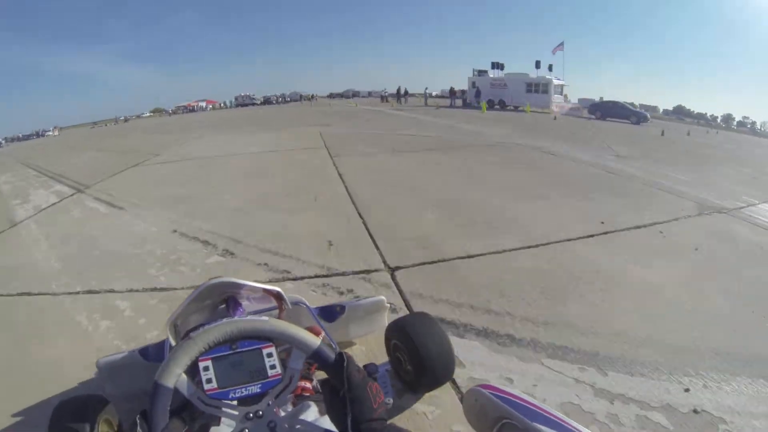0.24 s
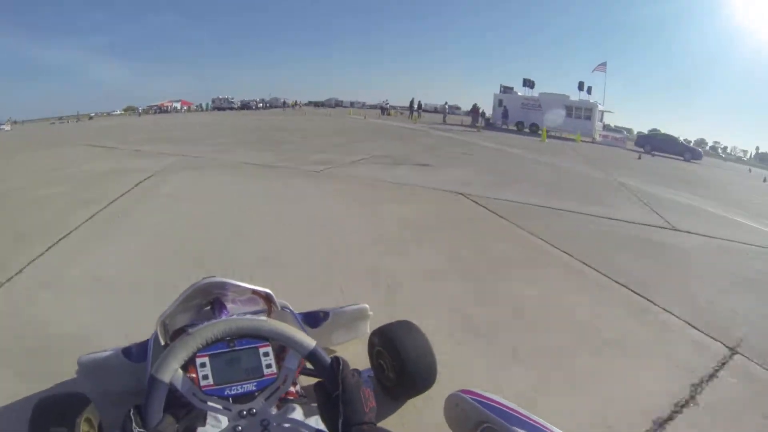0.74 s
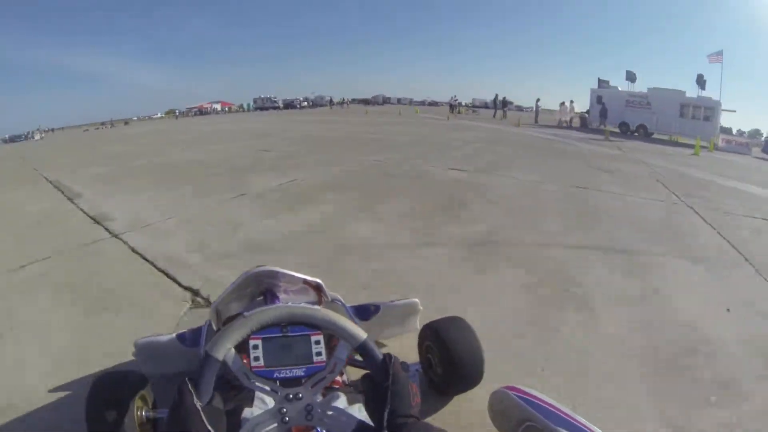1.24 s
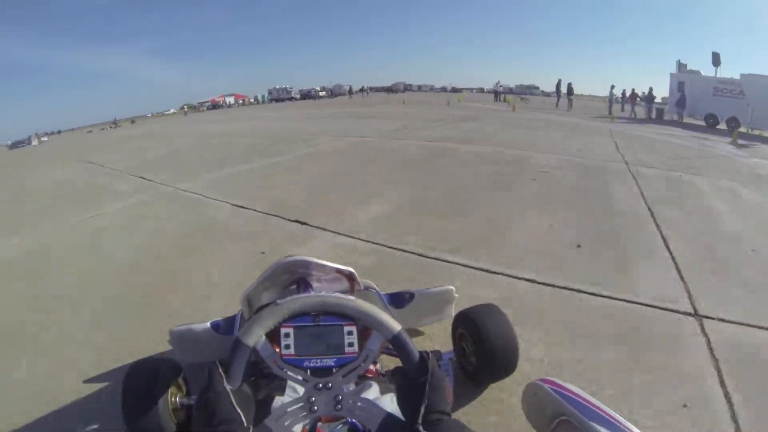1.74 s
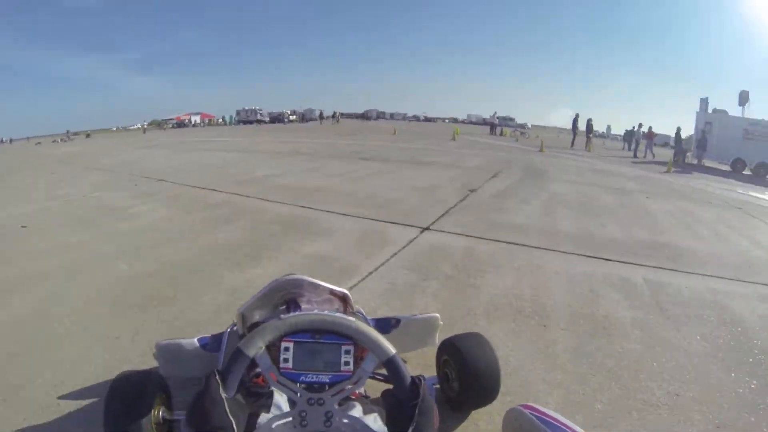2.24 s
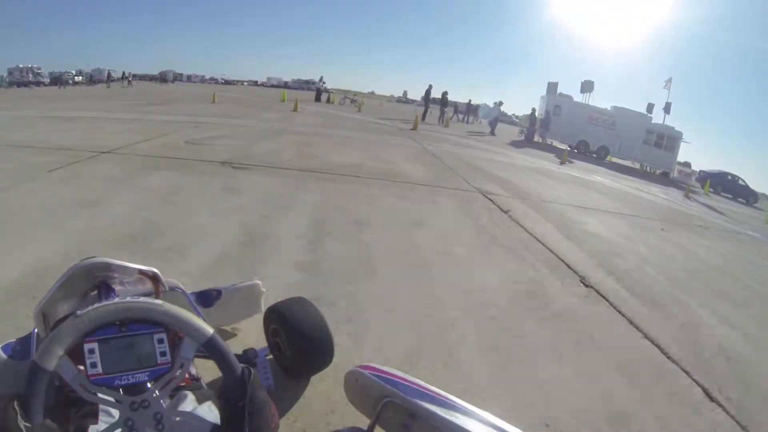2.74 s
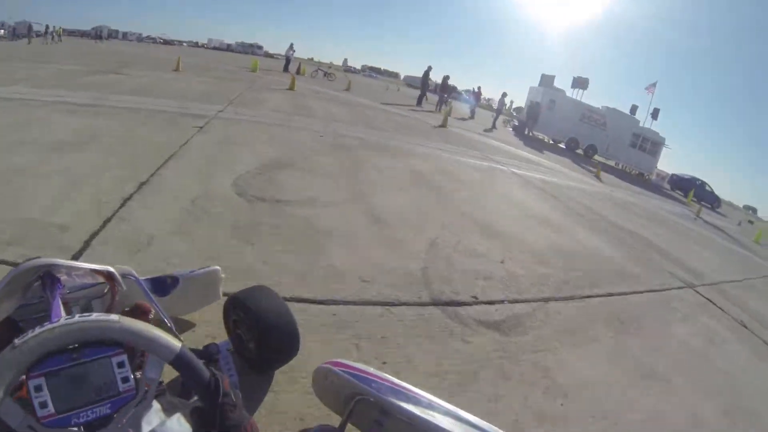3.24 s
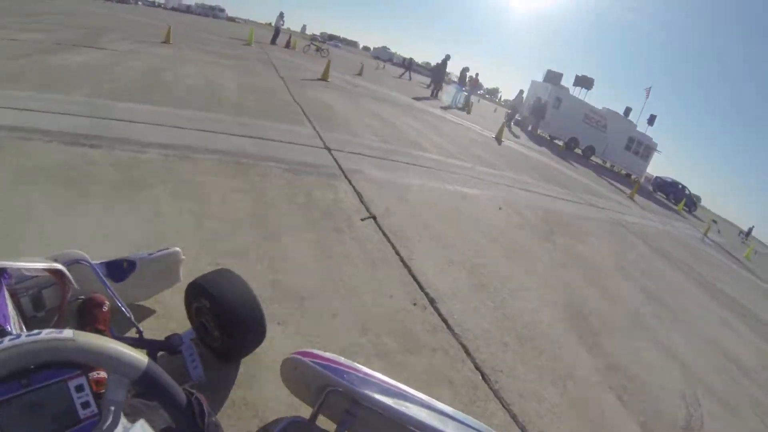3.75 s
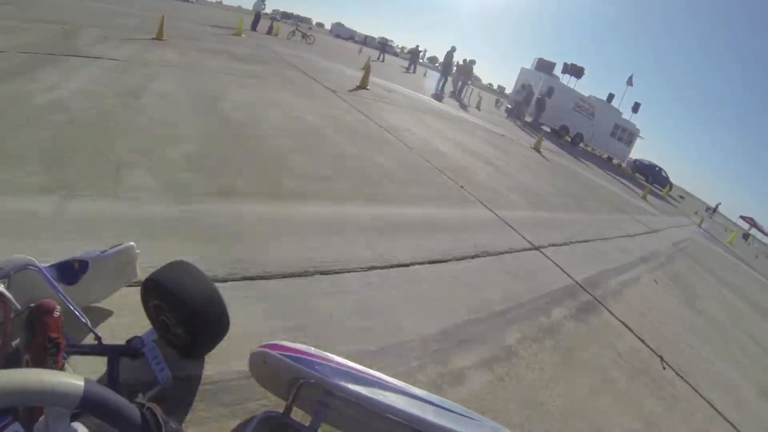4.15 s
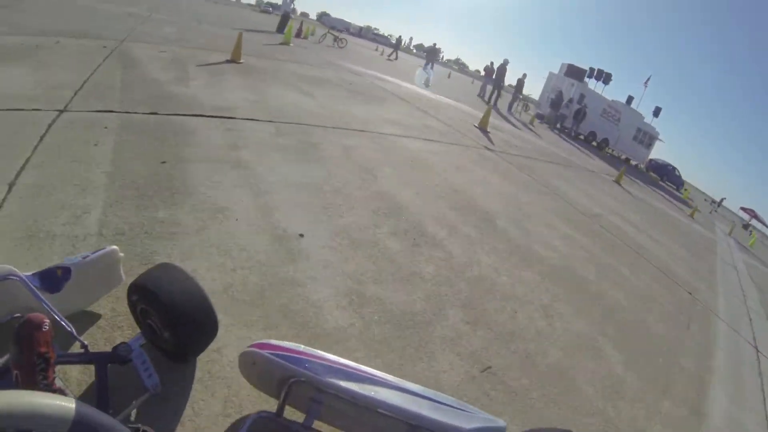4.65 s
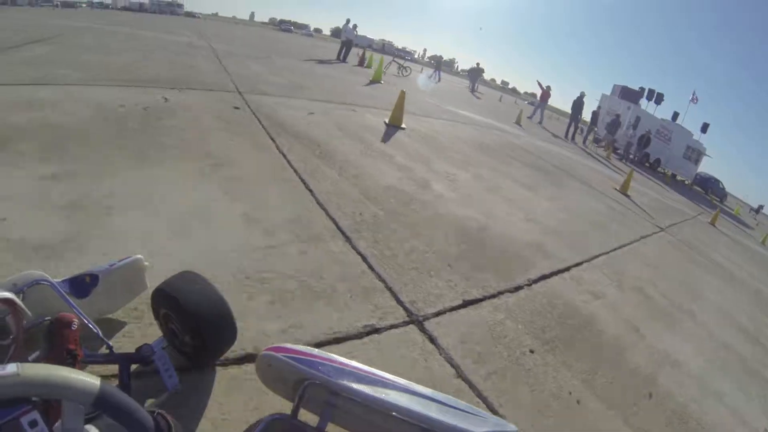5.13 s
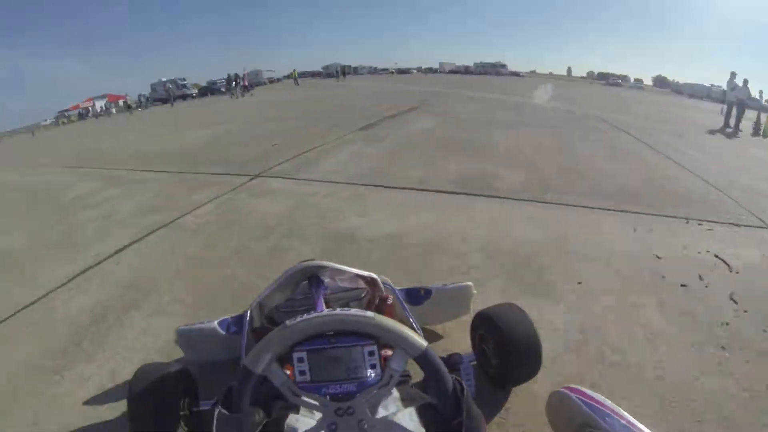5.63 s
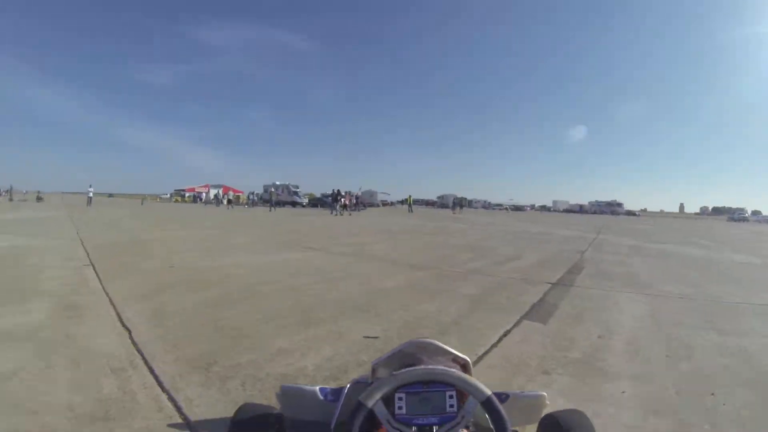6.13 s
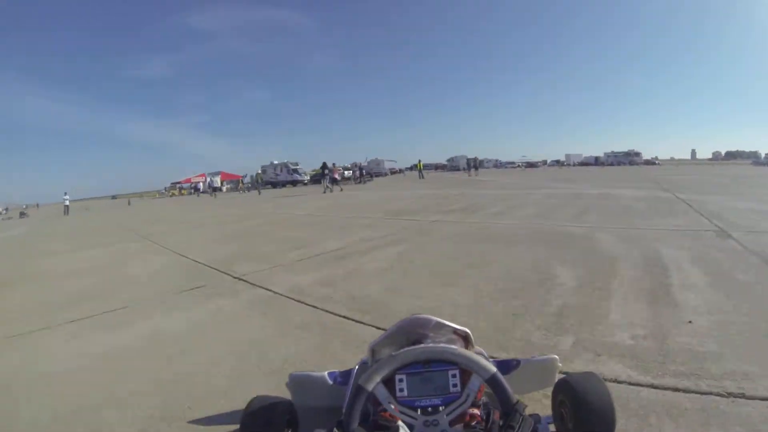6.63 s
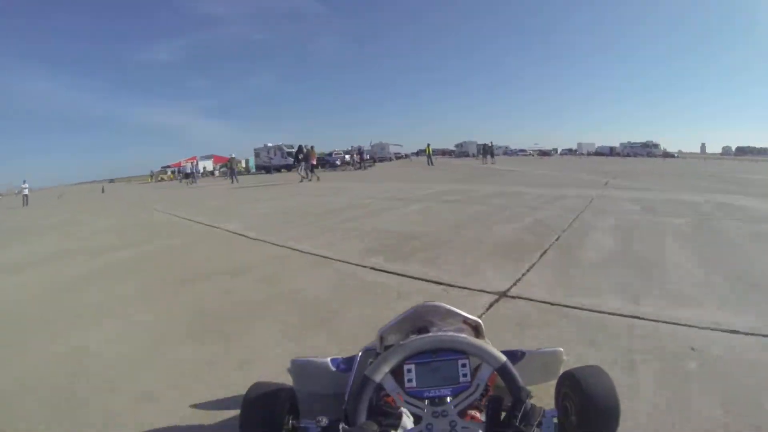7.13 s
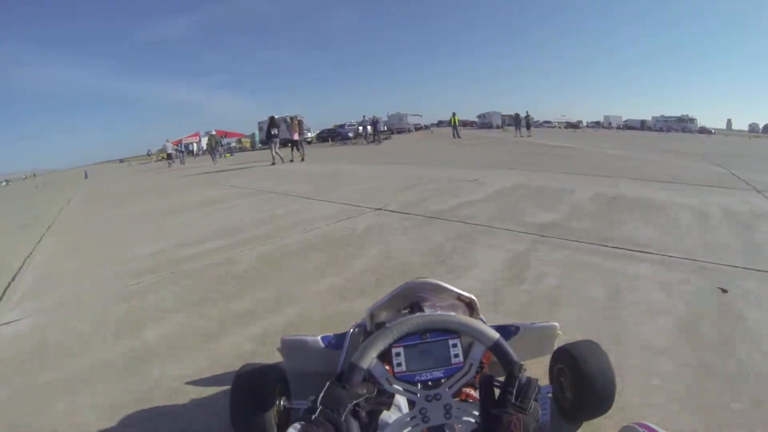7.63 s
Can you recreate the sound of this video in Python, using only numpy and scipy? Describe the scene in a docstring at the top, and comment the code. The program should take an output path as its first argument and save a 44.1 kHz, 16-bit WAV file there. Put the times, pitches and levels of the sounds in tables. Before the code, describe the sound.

A go-kart's single-cylinder engine putters and clatters near idle as it coasts over open concrete, heard from on board. Wind rumbles on the microphone and the frame shudders underneath. A faint, thin brake squeal swells and fades, with one sharp tick of grit. Then the engine revs up in a louder, barking burst for about a second and a half before easing off again.

```python
"""An open concrete course, heard from on board a kart with a four-stroke single-cylinder engine.
It coasts near idle through a long bend, takes a short burst of throttle and coasts again.
Underneath, wind buffets the microphone, the tyres roar and the frame shudders on the slabs;
the bend brings in a thin metallic brake rub. Up front, each engine cycle rattles the covers,
thumps the exhaust pipe and, under throttle, barks through the intake."""
import sys
import numpy as np
from scipy import signal
from scipy.fft import rfft, irfft, next_fast_len
from scipy.io import wavfile
from scipy.ndimage import uniform_filter1d, map_coordinates

SR = 44100
rng = np.random.default_rng(int(sys.argv[2]) if len(sys.argv) > 2 else 0)


def unload_audio(sound):
    """Save the sound as a 16-bit wav file, at the path given as the first command line argument."""
    columns = np.transpose(np.atleast_2d(sound))
    # keep every value between -1 and 1, then stretch to whole-number steps
    steps = np.round(np.clip(columns, -1, 1) * 32767)
    wavfile.write(sys.argv[1], SR, steps.astype(np.int16))


N = 347508
TIME = np.arange(N) / SR
FREQS = np.fft.rfftfreq(next_fast_len(N + SR // 2), 1 / SR)

# fader for the wind, ahead of its gusts: t/s, level/dB
WIND_FADER = [(0, -24), (1.5, -23.5), (2.1, -23.5), (3.1, -32.5), (5.95, -33), (6.2, -21), (7, -21.5),
              (7.88, -29)]
# tone of tyres rolling on concrete: f/Hz, gain/dB
TYRE_EQ = [(90, -8.5), (200, 3), (280, -0.5), (420, 3), (700, -3), (830, -10), (1500, -30)]
# grit flicked against the kart: t/s, level/dB, decay/s; its tone: f/Hz, gain/dB
GRIT_HITS = [(4.7333, -10.5, 0.0016)]
GRIT_EQ = [(500, -20), (1600, 6), (2600, 7), (3500, 6), (4800, -14), (6100, -6), (7200, -13), (8300, -5),
           (10000, -6), (11800, -25), (13700, -26), (14500, -34)]
# knocks over slab joints: t/s, level/dB, decay/s; their tone: f/Hz, gain/dB
JOINT_HITS = [(1.458, -30.5, 0.0068), (7.311, -23.5, 0.0056)]
JOINT_EQ = [(100, -26), (500, 23), (1100, 9), (2500, 3), (5200, 9), (7000, -43), (14000, -48)]
# loose metal chinking over bumps: t/s, level/dB, decay/s; its tone, shared by the sand: f/Hz, gain/dB
CHINK_HITS = [(2.357, -43, 0.01), (2.759, -39, .008), (3.078, -39, .011), (3.151, -40.5, 0.0087),
              (3.46, -40, .009), (3.627, -39, 0.0077), (4.689, -42, .008), (5.074, -37, .007)]
CHINK_EQ = [(3000, -22), (4500, -6), (5900, -14), (6800, 5), (7900, -15), (9200, -4), (10600, -21),
            (12100, -14), (14500, -28)]
# loose parts buzzing briefly: t/s, f/Hz, width/Hz, level/dB, half length/s
BUZZ_CUES = [(0.934, 1460, 140, -23, 0.0066), (2.364, 4400, 200, -42, 0.024), (4.071, 6780, 200, -38, .008),
             (7.332, 5100, 710, -40, 0.016), (7.405, 5050, 550, -37, .008)]
# fader for the chain's whirr: t/s, level/dB
CHAIN_FADER = [(0, -38), (1.5, -52.5), (5.4, -42), (6.9, -40), (7.3, -39.5), (7.88, -38.5)]
# chain and sprocket resonances: f/Hz, width/Hz, gain/dB
SPROCKET_MODES = [(2793, 125, 6), (5200, 180, -5.5), (5600, 310, -21)]
# fader for the brake disc's ringing note: t/s, level/dB
SQUEAL_FADER = [(0, -57), (2.2, -55), (3.3, -50.5), (4.2, -47), (4.4, -42), (4.9, -44), (5.45, -51),
                (5.9, -68)]
# brake disc resonances: f/Hz, width/Hz, gain/dB
DISC_MODES = [(3240, 190, 4), (4600, 130, -5), (6780, 150, -3.5), (9200, 380, -13.5)]
# rough patches of concrete that jolt the frame: t/s, level/dB, half length/s
JOLT_CUES = [(0.051, -23.5, 0.069), (0.44, -24.5, 0.093), (1.202, -24, 0.094), (2.136, -26, 0.053),
             (2.516, -26, .045), (2.677, -23, 0.068), (2.848, -20.5, 0.017), (4.7, -27.5, 0.14),
             (5.682, -24.5, 0.033), (6.22, -27, 0.12), (6.804, -29, 0.089), (7.302, -18, 0.04),
             (7.709, -23, 0.65)]
# fader for the low drone: t/s, level/dB
DRONE_FADER = [(0, -27), (1.2, -36.5), (2, -27), (3, -35), (3.25, -29.5), (3.7, -26), (4.05, -37.5),
               (4.6, -25), (5.45, -45.5), (5.9, -27), (7.12, -35.5), (7.5, -21.5), (7.88, -27.5)]
# rockers striking the valves: position/cycles, gain/dB
ROCKER_TAPS = [(.31, 0), (.06, -3.5), (-.16, -1.5), (-.44, -4.5)]
# resonances of crankcase and cylinder, valve cover and cooling fins: f/Hz, width/Hz, gain/dB
CASE_MODES = [(893, 35, -12.5), (957, 17, -7.5), (1416, 71, 6), (1552, 79, 4), (1662, 146, 0)]
COVER_MODES = [(2197, 99, 0)]
FIN_MODES = [(2613, 260, -7.5), (3210, 210, -7.5), (3880, 203, -6), (4198, 77, -8), (5590, 116, -19.5),
             (6400, 200, -21), (7000, 230, -27.5), (9740, 590, -29.5)]
# broad hiss of the running gear: f/Hz, gain/dB
HISS_EQ = [(400, 8), (780, 0), (960, -4), (1800, -19), (3000, 1), (4500, -4), (6000, -16.5), (7200, -12.5),
           (8200, -23.5), (9900, -18.5), (10700, -25), (11800, -22), (15000, -52)]
# carburettor spits as the throttle opens: t/s, level/dB, decay/s; their tone: f/Hz, gain/dB
SPIT_HITS = [(5.555, -36, .011), (5.585, -30.5, .01), (5.615, -34, .009), (5.646, -44, .012),
             (5.672, -43, .008)]
SPIT_EQ = [(2000, -20), (4000, 1), (5500, 7), (6200, -2), (10000, -5), (12500, -13), (14500, -19)]
# resonances of intake tract, air box and the throat at the throttle plate: f/Hz, width/Hz, gain/dB
TRACT_MODES = [(932, 54, 1), (1064, 58, 1.5), (1270, 79, 10.5), (1525, 150, 11), (1673, 55, 12)]
AIRBOX_MODES = [(1420, 190, 10.5), (1597, 183, 9.5), (2140, 98, 10.5), (2880, 140, 0.5), (3070, 155, 2.5),
                (3350, 170, -4), (3750, 180, -1), (4070, 270, -5)]
THROAT_MODES = [(3760, 410, 6), (5100, 310, 1.5), (5840, 200, -5.5), (7200, 1200, -10.5)]
# the finest spray of air and fuel: f/Hz, gain/dB
SPRAY_EQ = [(7000, 0), (10000, -1), (10700, -7), (11700, -2), (13000, -14), (14000, -7), (15000, -14)]
# exhaust pipe and silencer resonances: f/Hz, width/Hz, gain/dB
PIPE_MODES = [(139.4, 35.8, 5), (189.7, 27, 5), (261, 5.7, -14.5), (402.8, 31.5, 1.5), (520, 33, -13),
              (621, 140, -5), (741.4, 37, -3)]
# engine speed as firings per second: t/s, f/Hz
FIRING_RATE = [(0.0, 31.14), (0.8, 26.84), (1.3, 26.57), (1.7, 26.36), (2.15, 27.6), (2.6, 27.18),
               (3.45, 29.44), (3.8, 29.44), (4.4, 30.96), (4.9, 30.68), (5.2, 31.53), (5.52, 30.18),
               (5.72, 37.7), (5.95, 39.11), (6.85, 38.29), (7.03, 34.31), (7.3, 32.47), (7.88, 31.66)]
# throttle moves: t/s, opening/0-1
THROTTLE_MOVES = [(5.52, 0.13), (5.66, 0.66), (5.88, 0.74), (6.87, 0.78), (6.95, 0.5), (7.1, 0.23)]
# uneven combustion: t/s, raggedness/0-1
RAGGEDNESS = [(0, .45), (1.3, .6), (2.3, .6), (2.9, .1), (5.5, .04), (5.7, 0)]


def undb(db):
    """Decibels to gain."""
    return 10 ** (np.asarray(db) / 20)


def lane(table):
    """An automation lane: straight ramps between timed points."""
    return np.interp(TIME, *np.transpose(table))


def noise():
    """White noise."""
    return rng.standard_normal(N)


def unit(x):
    """Normalise to rms 1."""
    return x / np.sqrt(np.mean(x ** 2))


def even(x, span_s):
    """Ride the gain to hold rms near 1 over each short span."""
    size = int(span_s * SR)
    return x / np.sqrt(uniform_filter1d(uniform_filter1d(x ** 2, size), size) + 1e-12)


def through(x, response):
    """Pass a sound through a frequency response."""
    size = next_fast_len(N + SR // 2)
    return irfft(rfft(x, size) * response, size)[:N]


def eq(x, points):
    """Shape the tone with a drawn EQ curve."""
    hz, db = np.transpose(points)
    return through(x, undb(np.interp(np.log(FREQS + 1), np.log(hz), db)))


def band(x, low_hz, high_hz, order=2):
    """Butterworth band-pass."""
    return signal.sosfilt(signal.butter(order, [low_hz, high_hz], "band", fs=SR, output="sos"), x)


def ring(x, modes):
    """Ring a bank of resonances; neighbours swing in opposite polarity."""
    return sum((-1) ** k * undb(db) * signal.lfilter(*signal.iirpeak(hz, hz / width, fs=SR), x)
               for k, (hz, width, db) in enumerate(modes))


def duct(x, round_hz, keep, count):
    """A pressure wave runs up and down a duct, weaker on every round."""
    lag = int(SR / round_hz)
    return sum(keep ** k * np.pad(x, (k * lag, 0))[:N] for k in range(count))


def strokes(cycle, at, scatter_db, jitter_s):
    """One click per engine cycle, offset by `at` cycles, loose in level and timing."""
    count = np.arange(1, int(cycle[-1]) + 1)
    lateness, strength = rng.standard_normal((400, 2))[count].T
    when_s = np.interp(count + at, cycle, TIME) + jitter_s * lateness
    where = np.clip((when_s * SR).astype(int), 0, N - 1)
    clicks = np.zeros(N)
    clicks[where] = undb(np.broadcast_to(scatter_db, N)[where] * np.minimum(strength, 1))
    clicks[-1] = 0  # mute strokes that fall past the end
    return clicks


def puff(pulses, rise_s, decay_s):
    """A burst of turbulence after each click."""
    for span in (rise_s, decay_s):
        pulses = signal.lfilter([1], [1, -np.exp(-1 / (span * SR))], pulses)
    return unit(pulses * noise())


def wind(gust_db=3, gusts_per_s=9.1):
    """Gusts buffet the microphone with a lumpy sub rumble."""
    gusts = map_coordinates(rng.standard_normal(400), [TIME * gusts_per_s], mode="mirror")
    return undb(lane(WIND_FADER) + gust_db * gusts) * even(band(noise(), 7, 24, order=3), 0.085)


def tyres():
    """Rubber rolling on concrete lays a dull, even bed of roar."""
    return undb(-42) * unit(eq(noise(), TYRE_EQ))


def bend_swell(apex_s=4.48, rise_db_per_s=5.5, fall_db_per_s=4.5):
    """Gain for rub and scrub: peaks at the tightest point of the bend, then fades to a light drag."""
    fade_db = np.maximum(rise_db_per_s * (apex_s - TIME), fall_db_per_s * (TIME - apex_s))
    return np.hypot(undb(-39.5 - fade_db), undb(-54))


def scrub():
    """The tyres slip sideways through the bend with a dull rasp."""
    return undb(-5) * bend_swell() * unit(band(noise(), 813, 1116))


def sand(grains_per_s=59):
    """Fine grains off the tyres patter on the bodywork, mostly faint, now and then a clear tick."""
    grains = rng.random(N) < grains_per_s / SR
    accents = undb(2.7 * np.minimum(rng.exponential(size=N), 3))
    patter = puff(grains * accents, rise_s=0.0004, decay_s=0.0095)
    return undb(-59) * unit(band(eq(patter, CHINK_EQ), 4170, 10000))


def knocks(hits, tone):
    """Spot hits: cracks of shaped noise with a hard attack and a fast tail."""
    envelope = sum(undb(db) * (TIME >= s) * np.exp(-np.abs(TIME - s) / decay) for s, db, decay in hits)
    return envelope * unit(eq(noise(), tone))


def buzzes():
    """Each loose part swells and dies on its own resonance."""
    mix = 0
    for s, hz, width, db, half_length in BUZZ_CUES:
        tone = even(band(noise(), hz - width / 2, hz + width / 2), 0.01)
        mix = mix + undb(db) * np.exp(-((TIME - s) / half_length) ** 2) * tone
    return mix


def chain():
    """The chain whirrs over its sprocket."""
    return undb(lane(CHAIN_FADER)) * unit(band(ring(noise(), SPROCKET_MODES), 2300, 6100, order=3))


def brake_squeal(note_hz=5160, width_hz=85, wheel_hz=4.9, crest_s=4.72):
    """The dragging disc rings on one note that swells with every turn of the wheel."""
    tone = even(band(noise(), note_hz - width_hz / 2, note_hz + width_hz / 2, order=1), .05)
    tremolo_db = 1.8 * np.cos(2 * np.pi * wheel_hz * (TIME - crest_s))
    return undb(lane(SQUEAL_FADER) + tremolo_db) * tone


def brake_rub(cycle, snags_per_s=45):
    """The disc scrapes and snags on the pad as the frame twists in the bend."""
    scrapes = strokes(cycle, at=-0.15, scatter_db=2.6, jitter_s=0.0035)
    snags = rng.random(N) < snags_per_s / SR
    friction = puff(scrapes + snags, rise_s=0.00059, decay_s=0.0078) + .5 * noise()
    return bend_swell() * unit(band(ring(friction, DISC_MODES), 2500, 9700, order=3))


def drone(cycle, load):
    """The engine's low end: a hum twice a cycle over road rumble, with odd orders under load."""
    turn = 2 * np.pi * cycle
    road = even(band(noise(), 51.4, 88, order=3), 0.35)
    hum = even(np.sin(2 * turn) + 0.2 * np.sin(turn) + 0.28 * road, 0.24)
    torque = load * (undb(-34) * np.sin(turn) + undb(-27.5) * np.sin(3 * turn))
    return undb(lane(DRONE_FADER)) * hum + torque


def frame_shudder(cycle, firing_hz, mode_hz=106.1, width_hz=6.8, road_db=-31):
    """The frame shakes on the concrete, more when the fourth firing harmonic meets its bending mode."""
    kicks = unit(strokes(cycle, at=0.256, scatter_db=0, jitter_s=0.00052))
    flex = ring(kicks + .9 * noise(), [(105.1, 18.2, 0)])
    shudder = even(band(flex, 81, 128, order=3), .12)
    engine_power = undb(-27.5) ** 2 / (1 + (2 * (4 * firing_hz - mode_hz) / width_hz) ** 2)
    jolt_power = sum(undb(db) ** 2 * np.exp(-((TIME - s) / half_length) ** 2)
                     for s, db, half_length in JOLT_CUES)
    return np.sqrt(undb(road_db) ** 2 + engine_power + jolt_power) * shudder


def clatter(cycle, above_idle_hz, stumble):
    """The piston slaps in the case, rockers tap the cover and a closing valve ticks in the fins."""
    piston = strokes(cycle, at=-.34, scatter_db=2 + 4 * stumble, jitter_s=.0011)
    slap = puff(piston, rise_s=.0022, decay_s=.009)
    case = unit(band(ring(slap + 1.12 * noise(), CASE_MODES), 803, 1940, order=4))
    taps = sum(undb(db) * strokes(cycle, at, scatter_db=3, jitter_s=0.00094) for at, db in ROCKER_TAPS)
    seating = strokes(cycle, at=-.44, scatter_db=3, jitter_s=.0006)
    rockers = puff(taps, rise_s=.0006, decay_s=.003)
    ticks = puff(seating + .6 * taps, rise_s=.0009, decay_s=.004)
    cover = unit(band(ring(rockers + 0.94 * noise(), COVER_MODES), 1856, 2550))
    fins = unit(band(ring(ticks + 1.06 * noise(), FIN_MODES), 2410, 10300, order=3))
    hiss = unit(eq(ticks + 2.03 * noise(), HISS_EQ))
    # each layer comes up from its idle level with the revs
    return (undb(-32.5 + 0.3964 * above_idle_hz) * even(case, 0.24)
            + undb(-37 + 0.13 * above_idle_hz) * even(cover, 0.21)
            + undb(-40.5 + 0.14 * above_idle_hz) * even(fins, 0.39)
            + undb(-41.5 + 0.6659 * above_idle_hz) * hiss)


def intake(cycle, above_idle_hz, load):
    """Each gulp growls in the tract and barks in the air box, with a weaker gasp half a cycle on."""
    gulps = strokes(cycle, at=-.39, scatter_db=.7, jitter_s=.00003)
    tract_wave = duct(gulps, round_hz=153.7, keep=0.3, count=2)
    growl = unit(band(ring(tract_wave, TRACT_MODES), 800, 2090))
    surge = strokes(cycle, at=-.315, scatter_db=1.3, jitter_s=.00015)
    rush = puff(duct(surge, round_hz=380, keep=.62, count=3), rise_s=.0004, decay_s=.0017)
    gasp = puff(strokes(cycle, at=0.13, scatter_db=-0.5, jitter_s=0.0011), rise_s=0.0018, decay_s=0.0063)
    bark = unit(band(ring(rush + .2 * gasp, AIRBOX_MODES), 1300, 5960, order=5))
    crack = unit(band(strokes(cycle, at=-.365, scatter_db=1.5, jitter_s=.00003), 1050, 1900))
    spray = unit(band(eq(rush + 1.8 * noise(), SPRAY_EQ), 5900, 16000))
    sizzle = unit(band(ring(rush + 1.04 * noise(), THROAT_MODES), 3400, 8340))
    breath = unit(band(gasp, 1430, 1695))
    mix = (bark + undb(-2.5) * growl + undb(-11) * crack
           + undb(-28) * spray + undb(-15) * sizzle + undb(-12) * breath)
    return np.sqrt(load) * undb(-24 + .5 * above_idle_hz) * even(mix, 0.047)


def exhaust_pulses(cycle, throttle, overrun, stumble):
    """Each firing blows down into the pipe; when ragged, every second one is weak and a few may fail."""
    blowdown = strokes(cycle, at=.015, scatter_db=.3 + 1.8 * stumble, jitter_s=.00002)
    # on a shut throttle the pipe gulps back just after the blow-down
    backflow = strokes(cycle, at=0.1065, scatter_db=.4 + 1.5 * stumble, jitter_s=.00002)
    # a lighter pulse on the intake stroke turns into strong suction as the throttle opens
    offbeat = strokes(cycle, at=-0.2823, scatter_db=.6, jitter_s=.00002)
    offbeat_gain = 0.28 + 0.34 * overrun - 1.33 * throttle
    pulses = (1 - throttle) * (blowdown - 0.34 * backflow) + offbeat_gain * offbeat
    count = np.floor(cycle + .5).astype(int)
    limp = 1 - .8 * stumble * (count % 2 == 0)
    misfires = rng.random(400)[count] < .1 * stumble
    return pulses * limp * np.where(misfires, .25, 1)


def exhaust(cycle, above_idle_hz, throttle, stumble, smear_s_per_hz=1.1e-5, pivot_hz=475):
    """Gas pulses thump the pipe and silencer, louder and raspier when the wheels drive the engine."""
    overrun = (np.maximum.accumulate(throttle) - throttle) / throttle.max()  # throttle backed off
    pulses = exhaust_pulses(cycle, throttle, overrun, stumble)
    turbulence = puff(pulses, rise_s=0.0046, decay_s=0.0052)
    flow = unit(pulses) + (.03 + .9 * stumble) * turbulence
    # under load the wave is strong enough to come back along the header pipe
    flow = flow + 0.62 * duct(flow * throttle, round_hz=313, keep=0.8, count=3)
    # overrun lifts the upper tones; ragged, slow burns dull them
    flow = flow + (0.29 * overrun - 0.46 * stumble) * band(flow, 420, 915, order=1)
    # the silencer lets tones above the pivot out later, those below it earlier
    flow = through(flow, np.exp(-1j * np.pi * smear_s_per_hz * (FREQS - pivot_hz) ** 2))
    thump = even(band(ring(flow, PIPE_MODES), 118, 806, order=5), 0.22)
    return undb(-35.5 + 0.8262 * above_idle_hz + 4 * overrun) * thump


def scene(idle_hz=27):
    """The mono mix: revs and throttle play the engine over running gear, ground and wind."""
    firing_hz = lane(FIRING_RATE)
    cycle = np.cumsum(firing_hz) / SR
    above_idle_hz = firing_hz - idle_hz
    throttle, stumble = lane(THROTTLE_MOVES), lane(RAGGEDNESS)
    load = np.maximum(throttle - throttle[0], 0)  # opening beyond the idle stop
    engine = intake(cycle, above_idle_hz, load) + clatter(cycle, above_idle_hz, stumble)
    engine += exhaust(cycle, above_idle_hz, throttle, stumble)
    low_end = drone(cycle, load) + frame_shudder(cycle, firing_hz)
    running_gear = brake_rub(cycle) + brake_squeal() + chain()
    spots = buzzes() + knocks(SPIT_HITS, SPIT_EQ) + knocks(CHINK_HITS, CHINK_EQ)
    ground = tyres() + scrub() + sand() + knocks(GRIT_HITS, GRIT_EQ) + knocks(JOINT_HITS, JOINT_EQ)
    return (wind() + ground + spots + running_gear + low_end + engine)[None]


def record(dry, top_hz=14800):
    """A steep high cut takes the very top off the mix."""
    return signal.sosfilt(signal.ellip(8, .2, 70, top_hz, fs=SR, output="sos"), dry)


dry = scene()
out = record(dry)
unload_audio(out)
```